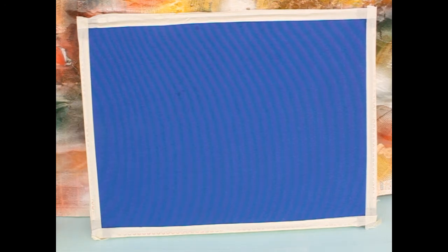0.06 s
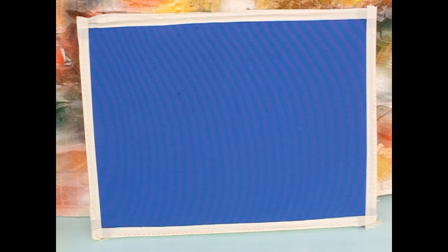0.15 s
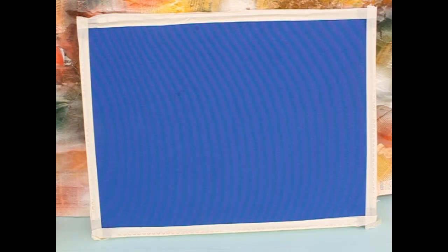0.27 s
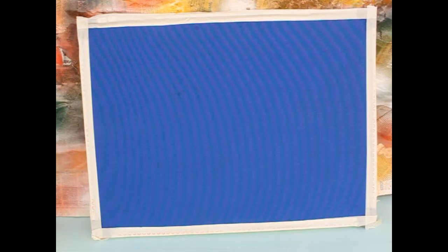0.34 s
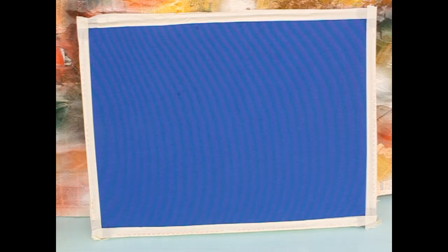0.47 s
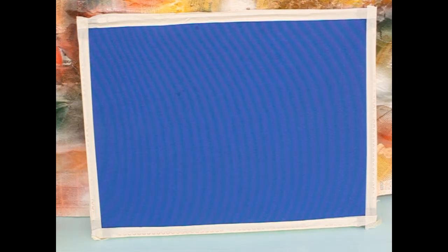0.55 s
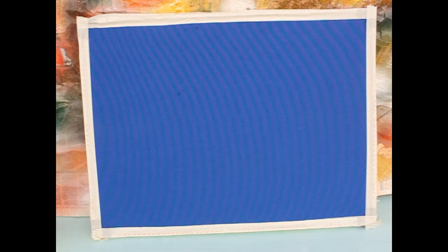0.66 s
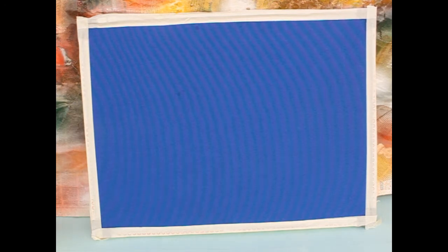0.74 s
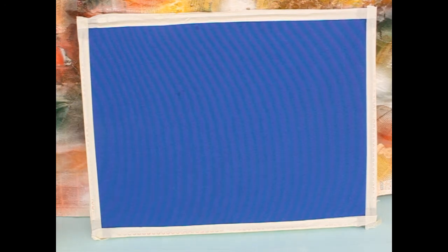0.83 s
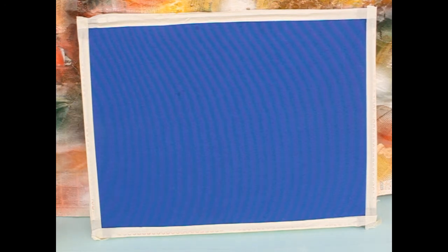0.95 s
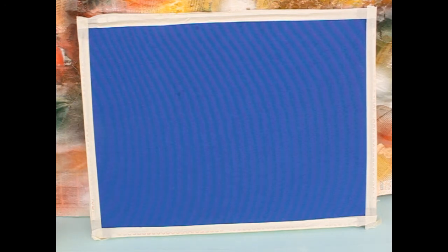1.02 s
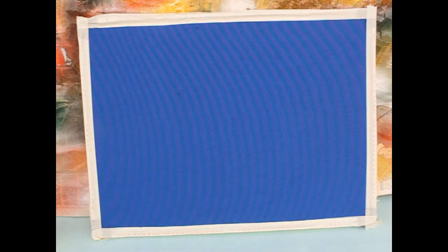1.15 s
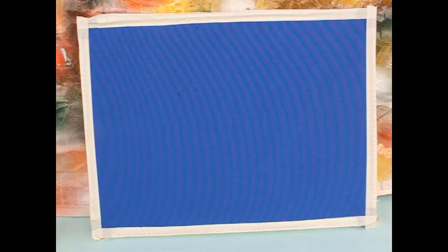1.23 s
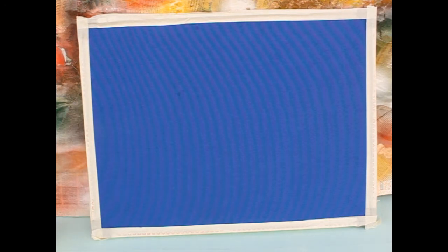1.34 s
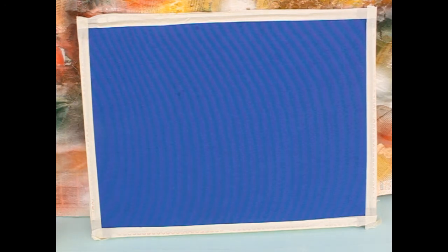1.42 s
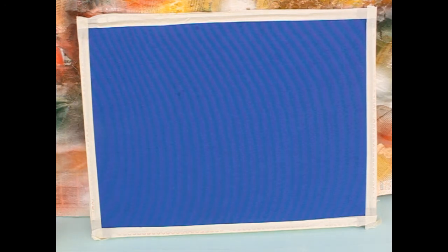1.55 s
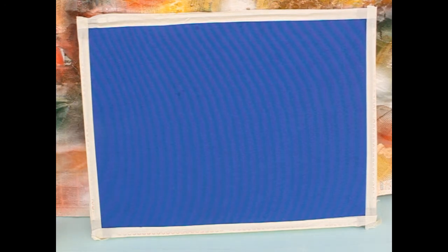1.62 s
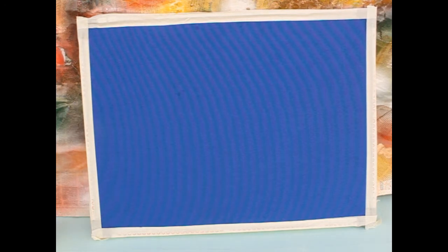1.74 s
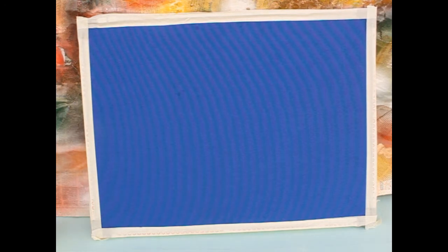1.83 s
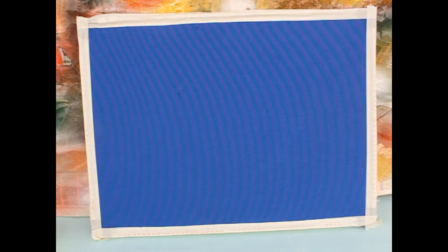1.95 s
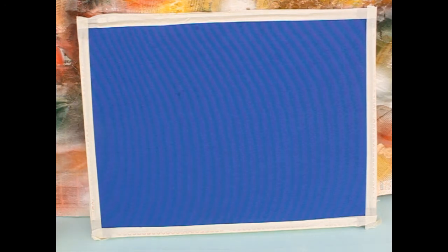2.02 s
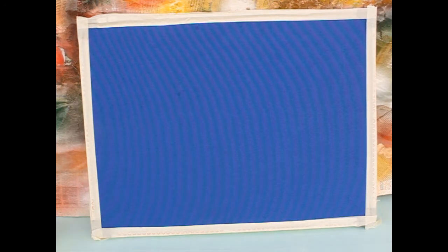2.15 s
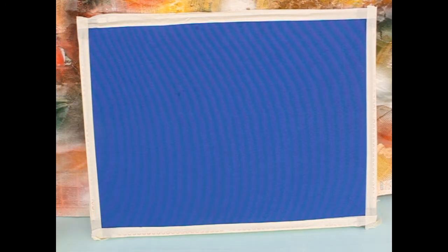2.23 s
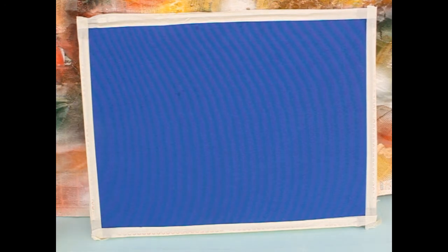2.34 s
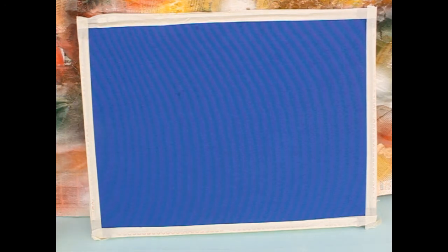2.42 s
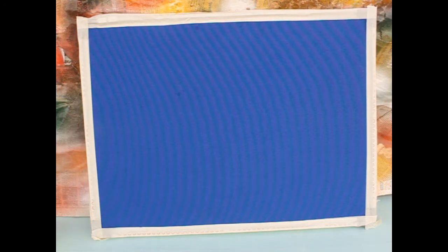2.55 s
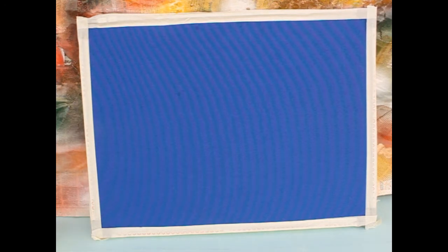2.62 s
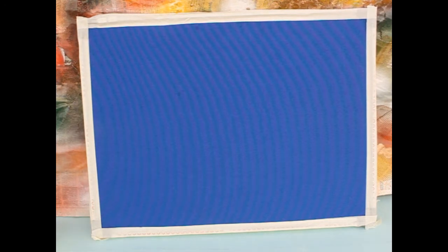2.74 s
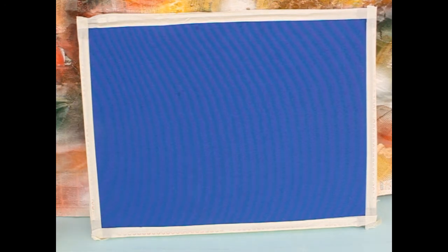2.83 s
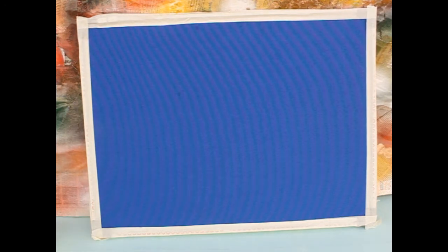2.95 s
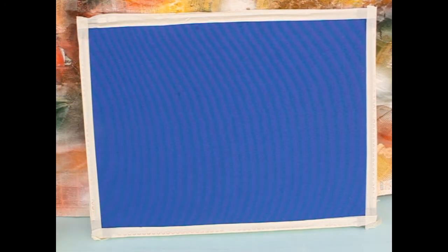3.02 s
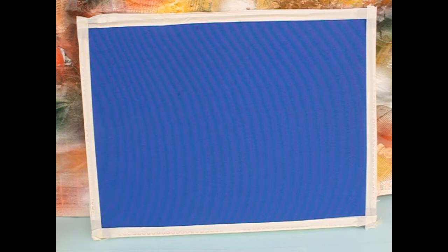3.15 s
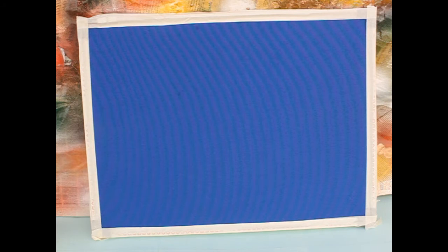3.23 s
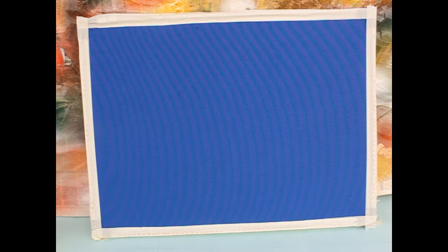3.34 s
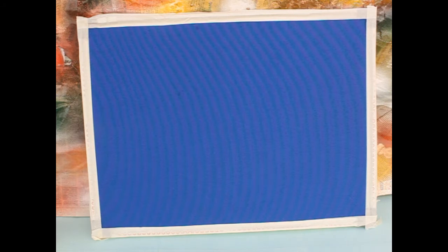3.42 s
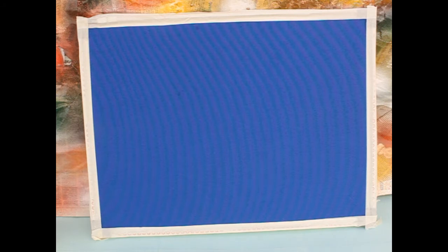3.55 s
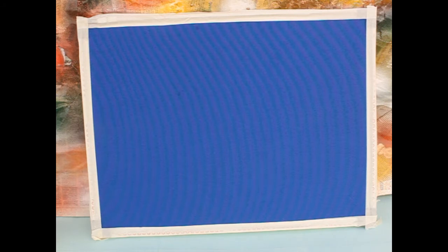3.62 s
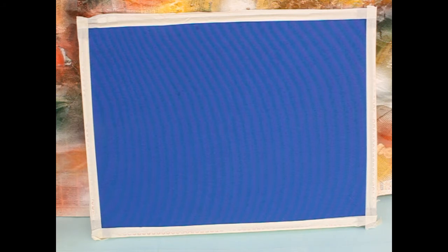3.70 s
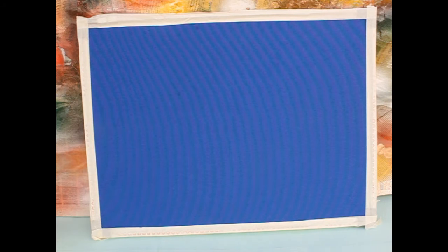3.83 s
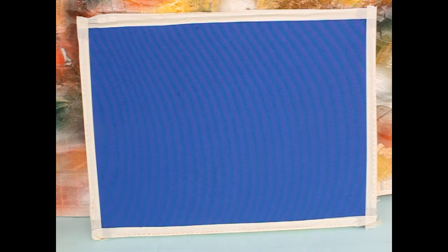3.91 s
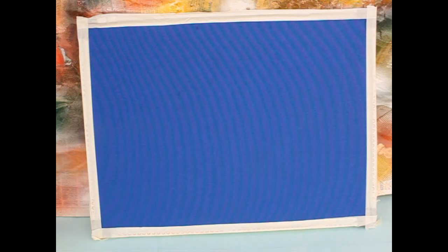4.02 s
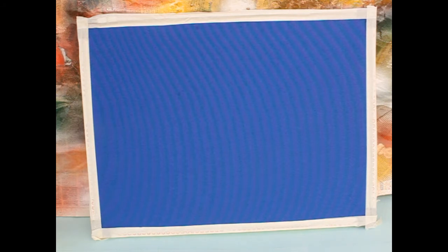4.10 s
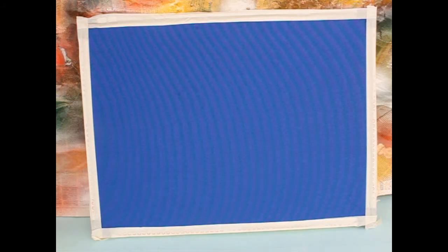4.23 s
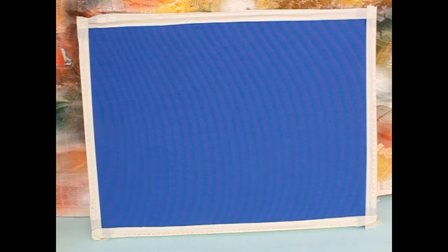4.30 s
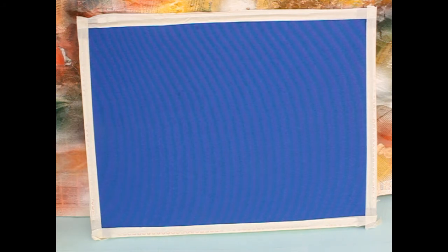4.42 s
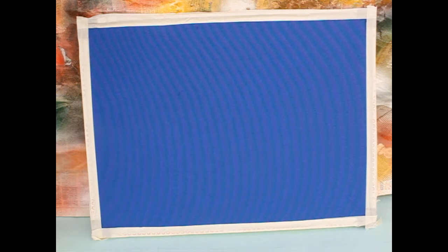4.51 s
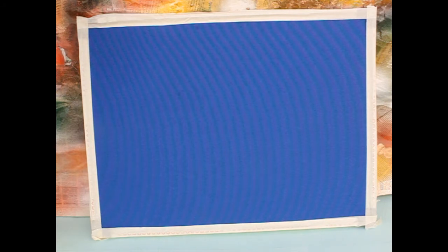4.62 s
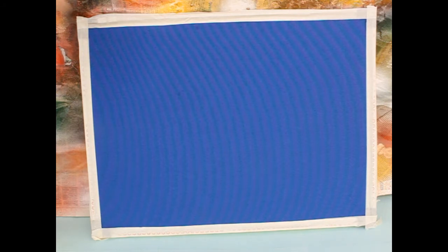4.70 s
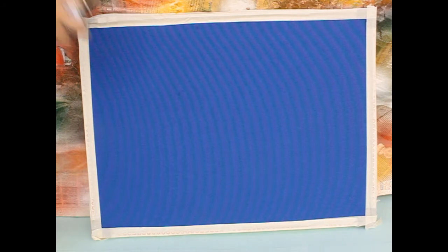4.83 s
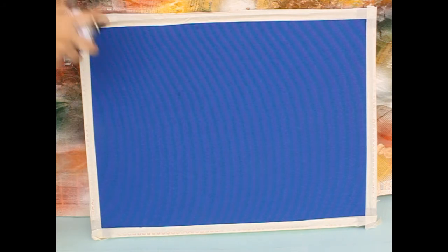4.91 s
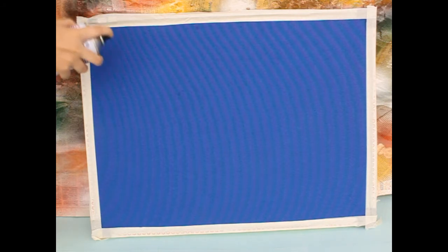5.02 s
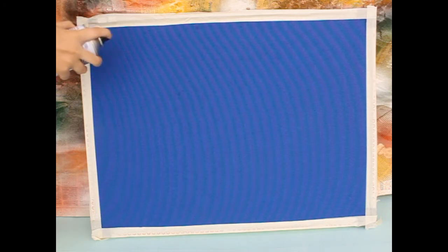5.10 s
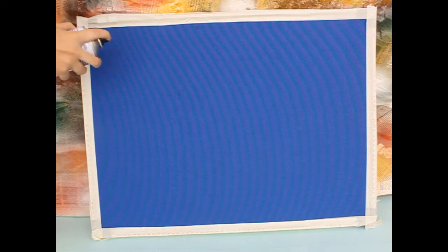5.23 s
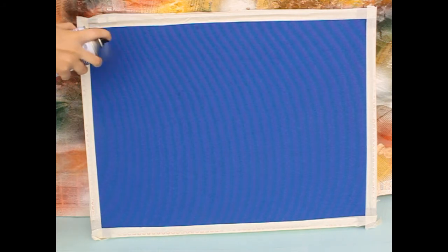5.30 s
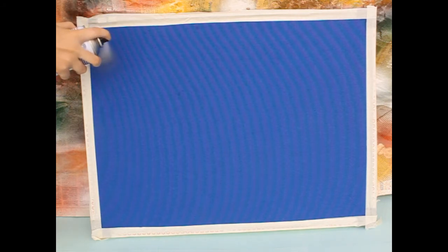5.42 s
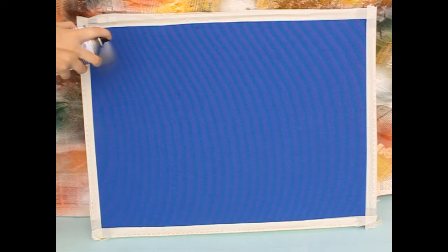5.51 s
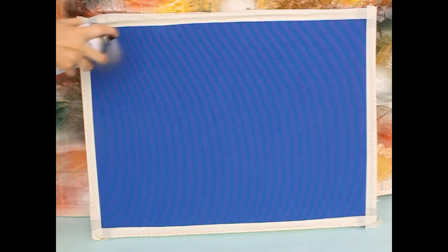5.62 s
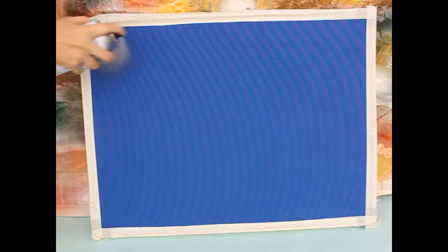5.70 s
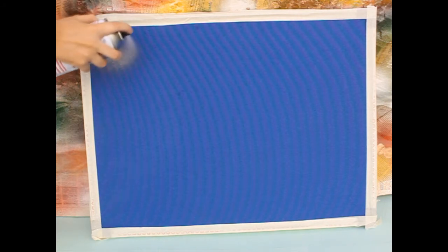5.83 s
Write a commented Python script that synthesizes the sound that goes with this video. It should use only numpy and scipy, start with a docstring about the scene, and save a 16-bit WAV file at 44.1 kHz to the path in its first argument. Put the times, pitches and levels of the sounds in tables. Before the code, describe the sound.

Close in a small quiet room, a spray paint can is shaken about four times a second, its hard ball clacking and rebounding against thin steel. Shaking stops just after three seconds. Quiet room noise follows, with a few last clicks near four seconds, soft air bumps, then a bright, steady spray hiss until the end.

```python
"""Spray can, shaken and sprayed

In a small room a paint can is shaken close to the microphone, with about four forward strokes a second.
Its mixing ball knocks on the thin steel ends and wall: noise cracks and damped modes, with close echoes.
A few last clicks follow, then the nozzle opens: shaped noise, combed by echoes off a canvas close by.
Stirred air bumps the microphone, over a soft room noise with sleeve rustle and a faint hum.
"""
import sys
import numpy as np
from scipy import signal
from scipy.fft import rfft, irfft
from scipy.io import wavfile
from scipy.ndimage import uniform_filter1d, map_coordinates

SR = 44100
rng = np.random.default_rng(int(sys.argv[2]) if len(sys.argv) > 2 else 0)


def master_out(mix):
    """Clip the mix to full scale and print it as 16-bit PCM to the path in sys.argv[1]."""
    frames = np.transpose(np.atleast_2d(mix))
    ceiling = np.clip(frames, -1, 1)
    pcm = np.round(ceiling * 32767).astype(np.int16)
    wavfile.write(sys.argv[1], SR, pcm)


N = 258426
TIME = np.arange(N) / SR

# forward strokes, the ball lands on the dome and rebounds; levels before the mix of parts:
# start_s, level_db, brightness_db, rebound_s, rebound_level_db
FORWARD = [(0.2102, -18, 4.5, 0.2315, -33.5), (0.3511, -14.5, -4, 0.3615, -35),
           (0.4209, -16.5, 3.5, 0.4564, -40), (0.6321, -23, -0.5, 0.648, -26.5),
           (0.6778, -28, 1, 0.7032, -25.5), (0.8617, -16.5, 0.5, 0.8774, -30),
           (1.0728, -20, 0.5, 1.1023, -22.5), (1.3186, -22.5, 4.0, 1.3371, -23.5),
           (1.5677, -28, 1.5, 1.5746, -23.5), (1.8126, -22, -0.5, 1.8261, -24),
           (2.0598, -20.0, 1.0, 2.0881, -29.5), (2.293, -20, 1.5, 2.3135, -23.5),
           (2.53, -21.5, -1, 2.5724, -26.5), (2.7784, -20.0, 2.5, 2.8089, -31),
           (3.0397, -23.5, 1.0, 3.0437, -21)]
# back strokes, the ball lands on the base and rebounds; levels before the mix of parts:
# start_s, level_db, brightness_db, rebound_s, rebound_level_db
BACK = [(0.1965, -24, -0.5, 0.2012, -25), (0.2927, -31, 2.5, 0.298, -39.5),
        (0.5518, -29, 2.0, 0.5962, -36.5), (0.7926, -27, -2, 0.8027, -30), (1.009, -30, -1.5, 1.0385, -34),
        (1.2316, -33.5, -0.5, 1.2575, -33.5), (1.494, -40.5, 1.5, 1.5054, -45),
        (1.7206, -34, 0.0, 1.75, -36.5), (1.9602, -32.5, 0.5, 1.9877, -37.0),
        (2.1997, -29.0, -0.5, 2.2358, -37.5), (2.4523, -33.5, 0.5, 2.4685, -53),
        (2.6885, -31, 1.5, 2.7019, -33.5), (2.9507, -37, 2.5, 2.9558, -43),
        (3.238, -38, 2.5, 3.2595, -45.5)]
# a harder contact moves energy from the body to the end cap and the tick, dB per dB of brightness:
# body, wall, end_cap, tick
BRIGHTEN = np.array([-1, 0, 1, 1])
# spectrum of cloth, and of paint sliding in the can: frequency_hz, level_db (relative)
RUSTLE_COLOUR = [(1500, 7.5), (3000, 4.5), (5000, 1.5), (7000, -3), (10000, -12.5), (15000, -10.5)]


def rattle(forward_echo_db=-5, back_echo_db=-4, rebound_echo_db=-2, tap_echo_db=-3, crisp=0.41):
    """Each stroke throws the ball at one end, where it rebounds once; brighter landings are drier."""
    # loose ball on the side wall, between strokes and as the can is turned upright; levels before the mix:
    # start_s, level_db, brightness_db
    taps = [(0.238, -31.5, 8.5), (0.4077, -26, -1.5), (0.5802, -46, -11), (0.6386, -25.5, 2),
            (0.6886, -40, 6), (0.7476, -31.5, -4), (0.8359, -33, -6.5), (0.8518, -38.5, -6.5),
            (0.9607, -37, -2.5), (1.023, -35.5, -2), (1.0861, -28, 3.5), (1.1808, -35.5, -4),
            (1.5342, -42, -3), (1.5989, -37.0, 4.5), (1.6346, -38, -0.5), (1.831, -36, 8), (1.8727, -43, 4),
            (1.9055, -37.5, 2.5), (2.0238, -36, -4), (2.1529, -43, -6), (2.3819, -38.5, -0.5),
            (2.5979, -36, 4), (2.6197, -33.5, 1), (2.7572, -37.5, -3.5), (2.8673, -44.5, -0.5),
            (2.9822, -44.5, -14.5), (3.001, -42, -3.5), (3.054, -40, -2), (3.0728, -34.5, -1),
            (3.0916, -39.5, -1), (3.124, -44, -10.5), (3.806, -27.5, -1), (3.9083, -35, -3),
            (3.9617, -38, 0), (3.9801, -37, -2.5), (4.013, -44, 3)]
    # how each kind of contact shares its energy: body_db, wall_db, end_cap_db, tick_db
    forward_mix = (-10.5, -5.5, 1, -9.5)
    back_mix = (-1.5, 1, -3.5, -10)
    tap_mix = (-8.5, -1.5, 0.5, -8)
    # change of colour on the rebound: body_db, wall_db, end_cap_db, tick_db
    rebound_mix = (0.89, 0.5, 0.48, -1.5)
    out = np.zeros(N)
    directions = ((FORWARD, forward_mix, forward_echo_db), (BACK, back_mix, back_echo_db))
    for strokes, mix, echo_db in directions:
        for start_s, level_db, bright_db, rebound_s, rebound_db in strokes:
            colour_db = np.array(mix) + bright_db * BRIGHTEN
            landing = knock(start_s, level_db + colour_db, echo_db - crisp * bright_db)
            rebound = knock(rebound_s, rebound_db + colour_db + rebound_mix, rebound_echo_db)
            add(out, start_s, landing)
            add(out, rebound_s, rebound)
    for start_s, level_db, bright_db in taps:
        colour_db = np.array(tap_mix) + bright_db * BRIGHTEN
        add(out, start_s, knock(start_s, level_db + colour_db, tap_echo_db))
    return out


def knock(when_s, levels_db, echo_db, scatter_s=0.0039, scatter=0.084):
    """One blow rings body, wall and end cap; things close by return it, scattered, 3 to 5 ms later."""
    # ringing of the can, part by part, before the scatter from blow to blow:
    # frequency_hz, level_db (relative), t60_s
    body = [(560, -26.5, 0.0027), (784, -20, 0.006), (1055, 1, 0.017), (1236, 9, 0.019), (1445, 11, 0.0152),
            (1700, 4.5, 0.013)]
    wall = [(2183, -2, 0.016), (2415, -7, 0.015), (2622, 0.5, 0.009), (2920, -1, 0.013),
            (3204, -1.5, 0.014)]
    dome = [(4110, -5, 0.0076), (4615, 0.5, 0.0076), (4996, -6.5, 0.0076), (5146, -3.5, 0.013),
            (5950, -4, 0.0035)]
    # the stiffer far end, in place of the dome: frequency_hz, level_db (relative), t60_s
    base = [(4640, -15.5, 0.00726), (5404, -2.5, 0.0099), (5960, -6.5, 0.0076), (7110, -3, 0.0086)]
    # band radiated by body, wall, end cap and contact in turn: lowest_hz, highest_hz
    parts_hz = [(430, 2050), (1650, 2620), (3650, 6770), (6700, 9900)]
    # sloshing paint loads the steel and lowers its ring, most of all at the ends: time_s, pitch_ratio (wall)
    paint_load = [(.2, 0.83), (.42, 0.93), (.7, 0.93), (1.1, 1), (4.1, 1)]
    t = np.arange(SR // 20) / SR

    lag = int(SR * rng.uniform(.0032, .0048))
    scattered = scatter * rng.standard_normal(len(t)) * np.exp(-t / scatter_s)
    echo = np.zeros(len(t))
    echo[lag:] = scattered[:-lag]
    echo[lag] += 1
    path = undb(echo_db) * echo / np.linalg.norm(echo)
    path[0] = 1  # direct sound

    # countless short-lived shell modes merge into a crack under the main ones
    crack = unit(rng.standard_normal(len(t)) * np.exp(-t / .0016))
    # the contact itself is shorter
    tick = unit(rng.standard_normal(len(t)) * np.exp(-t / .0008))
    load = np.interp(when_s, *np.transpose(paint_load))
    # an end cap that is weak beside the wall is the base
    end = dome if levels_db[2] > levels_db[1] - 2 else base
    parts = []
    for modes, pitch in ((body, 1), (wall, load), (end, load ** 1.5)):
        parts.append(unit(ring(modes, t, pitch)) + undb(-12) * crack)
    parts.append(tick)

    # third-order band edges: each part radiates only its own band
    s = 1j * np.fft.rfftfreq(len(t), 1 / SR) / np.array(parts_hz).T[:, :, None]
    radiated = s[0] ** 3 / np.prod((1 + s) * (1 + s + s ** 2), axis=0)
    parts = irfft(rfft(np.array(parts)) * radiated * rfft(path), len(t))
    # levels count the whole energy of a part as rms over 10 ms
    gains = undb(levels_db) * np.sqrt(SR // 100) / np.linalg.norm(parts, axis=1)
    return gains @ parts


def ring(modes, t, pitch):
    """Damped modes of the steel; their pitch and share scatter with where the ball lands."""
    hz, db, t60_s = np.transpose(modes)[:, :, None]
    detune, share = rng.standard_normal((2, len(modes), 1))
    hz = pitch * hz * (1 + .03 * detune)
    db = db + 4.5 * share
    decay = np.exp(-np.log(1000) * t / t60_s)
    return np.sum(undb(db) * np.sin(2 * np.pi * hz * t) * decay, axis=0)


def skitter(first_db=-44, follow=0.25, fade_db_per_s=80, gap_s=0.021, uneven=0.7, spread_db=3,
            bright_spread_db=3.0, echo_db=-6, count=8):
    """After each rebound the ball skitters on the wall, on average ever lighter, stronger after hard strokes."""
    # how a touch shares its energy: body_db, wall_db, end_cap_db, tick_db
    skitter_mix = (-1, -1.5, -7, -13.5)
    out = np.zeros(N)
    strokes = np.vstack([FORWARD, BACK])
    typical_db = strokes[:, 1].mean()
    for _, stroke_db, _, rebound_s, _ in strokes:
        waits_s = np.cumsum(gap_s * (1 + uneven * rng.uniform(-0.9, 1, count)))
        for wait_s, (force, bright) in zip(waits_s, rng.standard_normal((count, 2))):
            level_db = first_db + follow * (stroke_db - typical_db)
            level_db += spread_db * force - fade_db_per_s * wait_s
            colour_db = np.array(skitter_mix) + bright_spread_db * bright * BRIGHTEN
            add(out, rebound_s + wait_s, knock(rebound_s, level_db + colour_db, echo_db))
    return out


def hollow(rise_s=0.00067, bend=0.1, bend_s=0.0051):
    """Some knocks wake a hollow ring that bends up to its pitch as the paint clears the wall."""
    # hollow rings: start_s, level_db (before rise and decay), final_pitch_hz, t60_s
    rings = [(0.195, -17, 1453, .04), (0.2017, -12, 1905, .11), (.238, -20, 1946, 0.046),
             (.293, -15, 1545, 0.027), (0.35, -14.5, 1296, 0.025), (0.5948, -21.5, 1420, 0.03),
             (.8027, -17, 2120, 0.023), (1.0385, -24, 2130, 0.032), (1.1803, -21, 2110, 0.035),
             (2.5982, -25, 2120, .04), (2.9558, -24, 2120, 0.024), (3.055, -19, 2260, 0.025),
             (3.806, -20, 2070, 0.037)]
    out = np.zeros(N)
    t = np.arange(SR // 8) / SR
    for start_s, level_db, hz, t60_s in rings:
        phase = 2 * np.pi * np.cumsum(hz * (1 - bend * np.exp(-t / bend_s))) / SR
        envelope = np.minimum(t / rise_s, 1) * np.exp(-np.log(1000) * t / t60_s)
        add(out, start_s, undb(level_db) * np.sin(phase) * envelope)
    return out


def rolling(roll_db=-52, fade_db_per_s=0.5, after_s=0.056, width_s=0.097, grain_db=3.5):
    """Ball and paint slide down the wall after each forward stroke, quieter as the paint loosens."""
    slide = sum(swell(row[0] + after_s, width_s) for row in FORWARD)
    level_db = roll_db - fade_db_per_s * TIME + grain_db * walk(120)
    return slide * undb(level_db) * noise(RUSTLE_COLOUR)


def spray(rise_s=0.013, sputter_s=0.03, surge=0.12):
    """Turbulent gas from the nozzle; echoes off the canvas comb it, and the comb slides with the hand."""
    # spectrum of the bare jet: frequency_hz, level_db (relative)
    jet_colour = [(2500, -25), (3400, -24), (3850, -13.5), (4250, -18), (4700, -7), (5250, -10.5),
                  (5950, -9), (7800, -8), (10000, -4.5), (11500, -1.5), (13200, -0.5), (15500, -5)]
    # hand travel: time_s, delay_ms (extra path of the first canvas echo)
    travel = [(5.3, .43), (5.5, .44), (5.6, .47), (5.65, .49), (5.72, .52), (5.86, .56)]
    # canvas echoes: gains of the first and second return
    canvas_echo = (.3, .2)
    # clots of paint pass the nozzle: time_s, spatter_db (before the level wander)
    sputters = [(5.445, -46.5), (5.775, -44.5)]
    open_s, press_s, half_open_db = 5.332, 0.057, -5.5
    hiss_db, spatter_db = -24.5, -45.5

    bare = noise(jet_colour)
    lag_s = curve(travel) / 1000
    jet = bare.copy()
    for k, gain in enumerate(canvas_echo, 1):
        jet += gain * map_coordinates(bare, [(TIME - k * lag_s) * SR], order=3)
    jet = unit(jet + room(jet, wet_db=-15, t60_s=0.29, lo_hz=1500, hi_hz=16100))
    spatter = unit(band(rng.standard_normal(N), 570, 4000))

    # the finger opens the valve, then presses it home
    since_open_s = TIME - open_s
    press_db = half_open_db * np.clip(1 - since_open_s / press_s, 0, 1)
    valve = np.clip(since_open_s / rise_s, 0, 1) * undb(press_db)
    gas = undb(hiss_db) * (1 + surge * sum(swell(s, sputter_s) for s, _ in sputters))
    paint = undb(spatter_db) + sum(undb(db) * swell(s, sputter_s) for s, db in sputters)
    return valve * undb(1.25 * walk(45)) * (gas * jet + paint * spatter)


def draught(flutter_db=2, bump_s=0.0022):
    """The moving arm pushes air at the microphone: a fluttering rumble and single soft bumps."""
    # spectrum of the rumble: frequency_hz, level_db (relative)
    draught_colour = [(25, -13), (50, -6), (85, 3), (130, 0.5), (220, -7.5), (320, -15), (450, -27),
                      (900, -57.5)]
    # sweeps of the arm: centre_s, half_length_s, level_db (before the flutter)
    gusts = [(.01, 0.056, -22), (0.147, 0.11, -36), (.21, 0.013, -33.5), (0.363, 0.043, -35.5),
             (0.411, 0.01, -32), (0.525, 0.018, -44), (.85, 0.029, -44.5), (2.759, 0.021, -42),
             (2.913, 0.058, -57), (4.548, 0.039, -39), (4.74, 0.053, -39), (4.889, 0.039, -33),
             (5.332, 0.038, -38.5), (5.412, 0.059, -38), (5.51, 0.029, -29.5), (5.648, .015, -35.5),
             (5.737, 0.033, -27.5)]
    # single bumps of air: start_s, peak_db, pitch_hz
    bumps = [(0.011, -9.5, 120), (4.564, -27, 130), (5.789, -10, 134)]
    strength = sum(undb(db) * swell(s, width_s) for s, width_s, db in gusts)
    rumble = noise(draught_colour)
    rumble = rumble / np.sqrt(uniform_filter1d(rumble ** 2, SR // 25))  # eddies of about even strength
    out = strength * undb(flutter_db * walk(60)) * rumble
    t = np.arange(SR // 20) / SR
    for start_s, peak_db, hz in bumps:
        bump = np.sin(2 * np.pi * hz * t) * t * np.exp(-2 * t / bump_s)
        add(out, start_s, undb(peak_db) * bump / np.abs(bump).max())
    return out


def background(room_db=2, hiss_db=-20, swish_db=-57, swish_s=4.4, swish_width_s=0.2, hum_hz=504):
    """Shaped noises for the room, its light hiss and a sleeve, and a wavering sine for a faint hum."""
    # spectrum of the room noise: frequency_hz, level_db (relative)
    room_colour = [(18, -20), (30, -4.5), (230, -5), (455, -9), (505, -9), (622, -11), (767, -9.5),
                   (1080, -9), (2020, -13.5), (4190, -26), (4910, -23.5), (6370, -31), (15500, -37.5)]
    # course of the room noise, before room_db or hiss_db is added: time_s, level_db
    room_level = [(0.0, -39), (1.21, -64.5), (1.3, -65.5), (2.09, -61), (2.32, -62), (2.76, -65.5),
                  (3.53, -58.5), (3.91, -52.5), (5.3, -48)]
    # sleeve as the shaking starts and as the can is turned:
    # centre_s, half_length_s, level_db (before the level wander)
    rustles = [(0.11, 0.09, -36.5), (4.03, 0.1, -51.5)]
    # the hum comes and goes: centre_s, half_length_s, level_db
    hums = [(3.559, 0.15, -67), (4.991, .07, -53), (5.186, 0.054, -50), (5.8, 0.42, -57.5)]
    level_db = curve(room_level)
    air = undb(level_db + room_db + 0.81 * walk(36)) * noise(room_colour)
    sleeve = sum(undb(db) * swell(s, width_s) for s, width_s, db in rustles)
    rustle = (sleeve * undb(1.1 * walk(25)) + undb(level_db + hiss_db)) * noise(RUSTLE_COLOUR)
    # the sleeve swishes as the arm is raised
    cloth = unit(band(rng.standard_normal(N), 3200, 5700))
    swish = undb(swish_db) * swell(swish_s, swish_width_s) * cloth
    hum = np.sqrt(2) * np.sin(2 * np.pi * np.cumsum(hum_hz * (1 + 0.0077 * walk(25))) / SR)
    hum_level = sum(undb(db) * swell(s, width_s) for s, width_s, db in hums)
    return air + rustle + swish + hum_level * hum


def room(x, wet_db, t60_s, lo_hz, hi_hz):
    """A diffuse, decaying noise tail that sets in after the nearest walls have answered."""
    t = np.arange(SR // 2) / SR
    onset = np.clip((t - .004) / 0.012, 0, 1)
    tail = band(rng.standard_normal(len(t)), lo_hz, hi_hz) * np.exp(-np.log(1000) * t / t60_s) * onset
    return undb(wet_db) * signal.fftconvolve(x, tail / np.linalg.norm(tail))[:N]


def undb(db):
    """Decibels to gain."""
    return 10 ** (np.asarray(db) / 20)


def unit(x):
    """Scale to rms 1."""
    return x / np.sqrt(np.mean(x ** 2))


def curve(rows):
    """Second column of a table, joined by straight lines in time."""
    return np.interp(TIME, *np.transpose(rows))


def swell(s, width_s):
    """A smooth rise and fall around time s, down to 1/e at width_s either side."""
    return np.exp(-((TIME - s) / width_s) ** 2)


def band(x, lo_hz, hi_hz):
    """Gentle band-pass."""
    edges_hz = [lo_hz, min(hi_hz, SR / 2 - 1000)]
    return signal.sosfilt(signal.butter(2, edges_hz, "band", fs=SR, output="sos"), x)


def noise(colour):
    """Noise of rms 1 with a spectrum of (Hz, dB) points, falling away below the first."""
    hz, db = np.transpose(colour)
    f = np.maximum(np.fft.rfftfreq(N, 1 / SR), 1)
    gain = undb(np.interp(np.log(f), np.log(hz), db)) * np.minimum(f / hz[0], 1) ** 2
    return unit(irfft(rfft(rng.standard_normal(N)) * gain, N))


def walk(rate_hz):
    """Smooth random wander of rms 1, with rate_hz new values a second."""
    k = int(SR / rate_hz)
    steps = np.repeat(rng.standard_normal(N // k + 1), k)
    return unit(uniform_filter1d(uniform_filter1d(steps, k), k)[:N])


def add(out, s, x):
    """Mix x into out from time s on."""
    i = max(int(s * SR), 0)
    out[i:i + len(x)] += x[:max(N - i, 0)]


def scene():
    """Everything reaches one microphone; both channels are alike."""
    can = rattle() + skitter() + hollow()
    early = room(can, wet_db=-26.5, t60_s=0.088, lo_hz=700, hi_hz=11130)
    late = room(can, wet_db=-29, t60_s=0.79, lo_hz=905, hi_hz=6570)
    mono = can + early + late + rolling() + spray() + draught() + background()
    return np.array([mono, mono])


def record(dry, top_hz=15720):
    """The microphone drops the deepest bass, the highest peaks clip, and the top is cut off."""
    thinned = signal.sosfilt(signal.butter(2, 42, "high", fs=SR, output="sos"), dry)
    clipped = np.clip(thinned, -.93, .93)
    return signal.sosfilt(signal.ellip(10, .2, 70, top_hz, fs=SR, output="sos"), clipped)


dry = scene()
out = record(dry)
master_out(out)
```